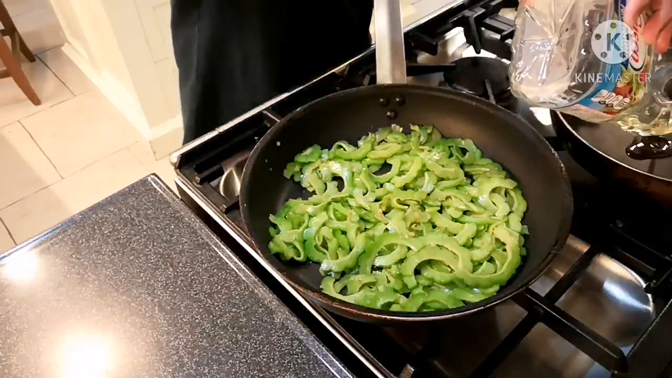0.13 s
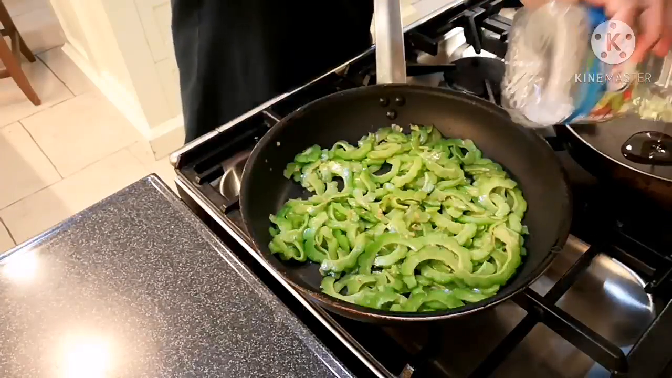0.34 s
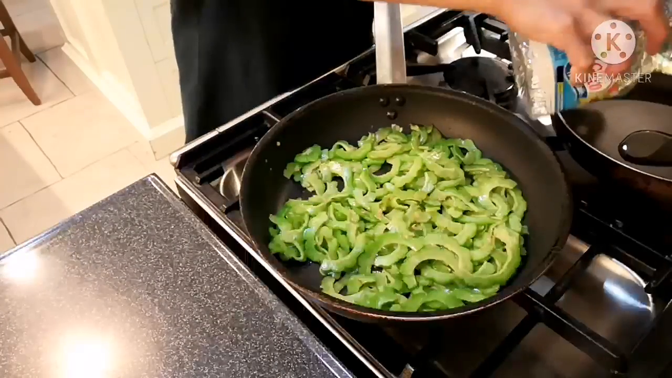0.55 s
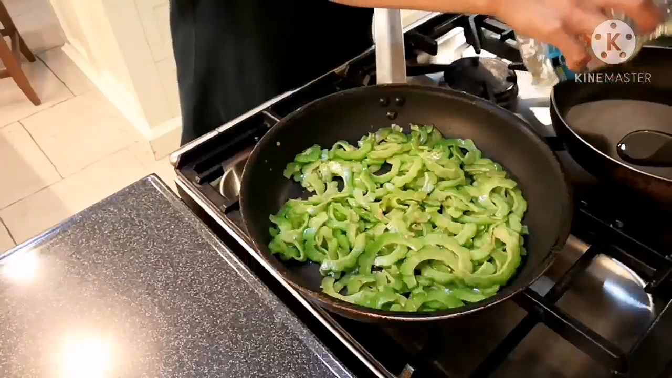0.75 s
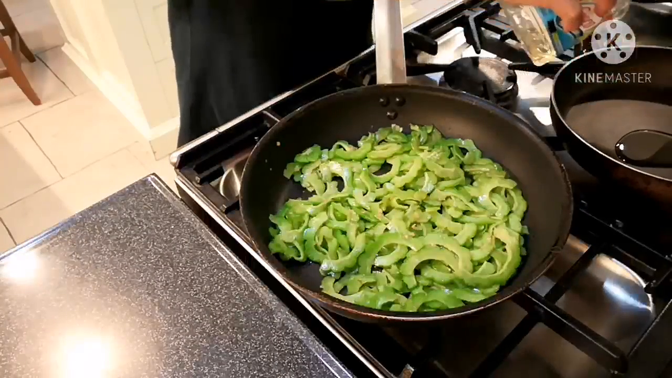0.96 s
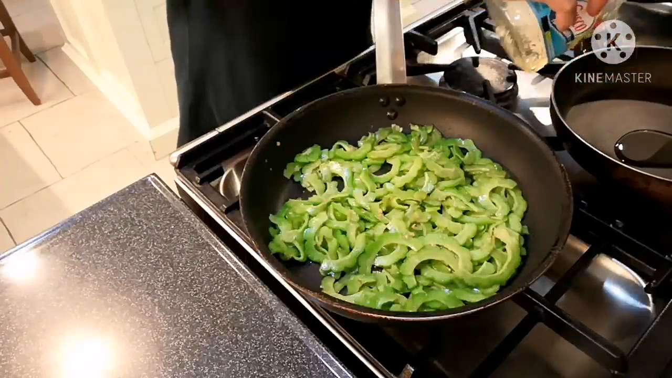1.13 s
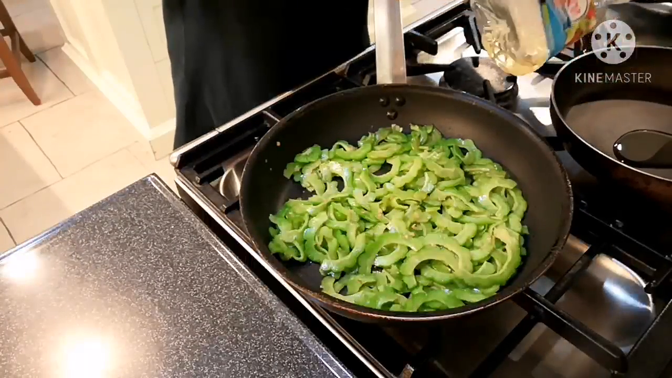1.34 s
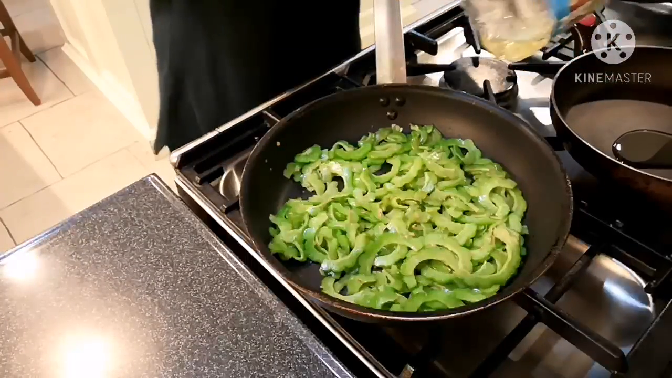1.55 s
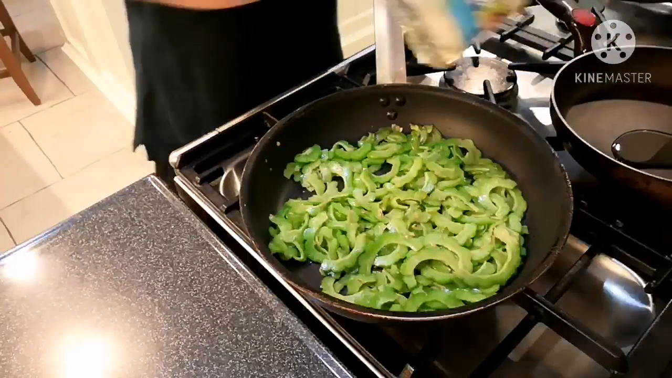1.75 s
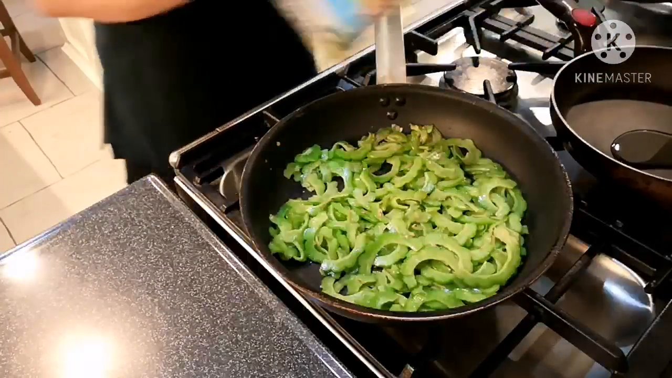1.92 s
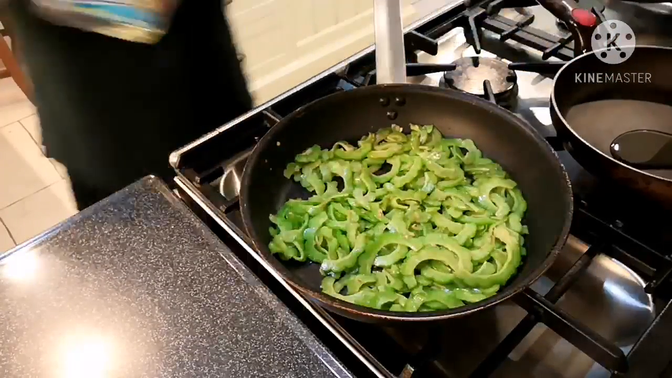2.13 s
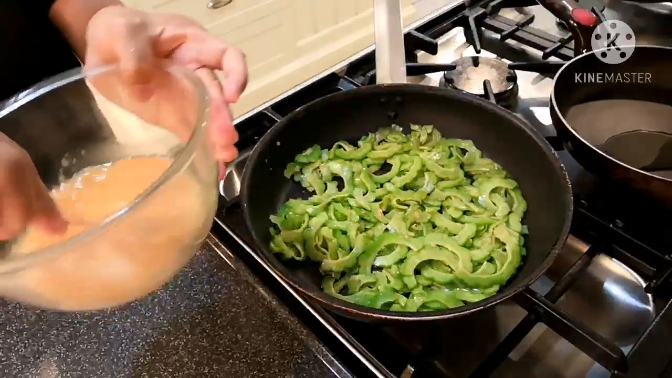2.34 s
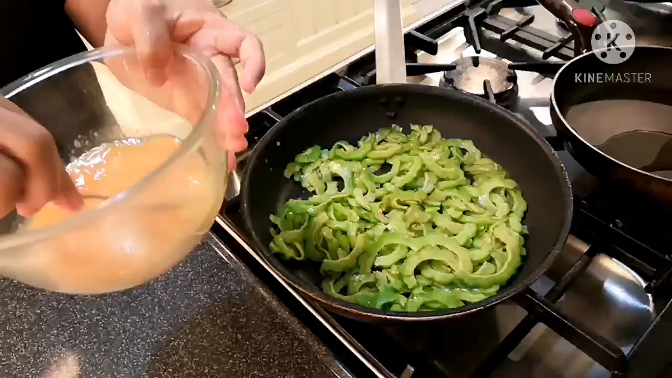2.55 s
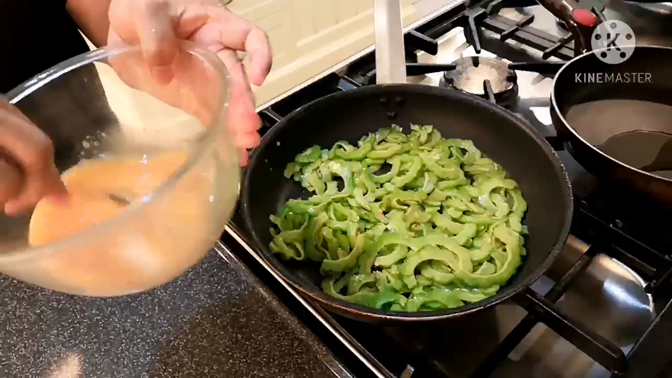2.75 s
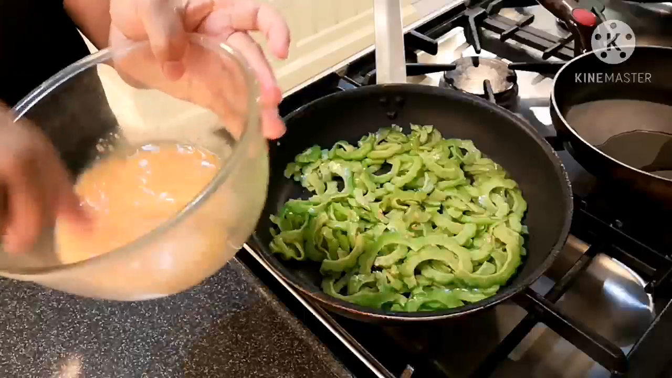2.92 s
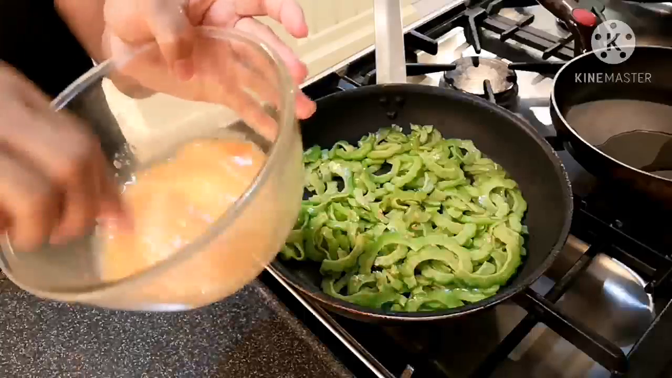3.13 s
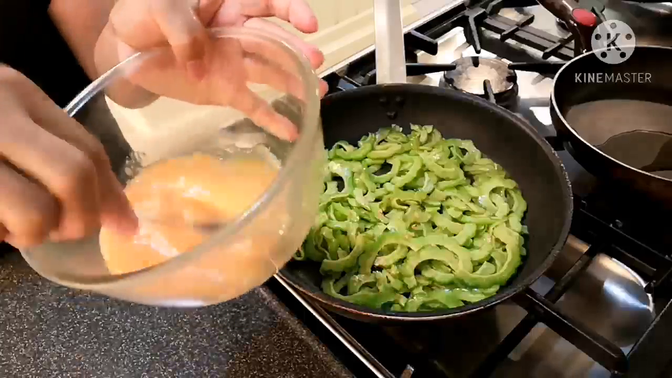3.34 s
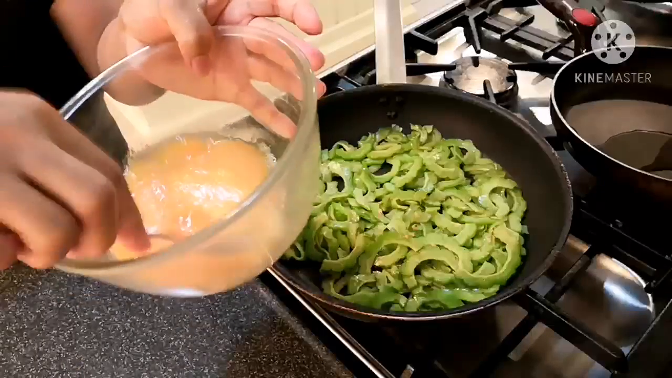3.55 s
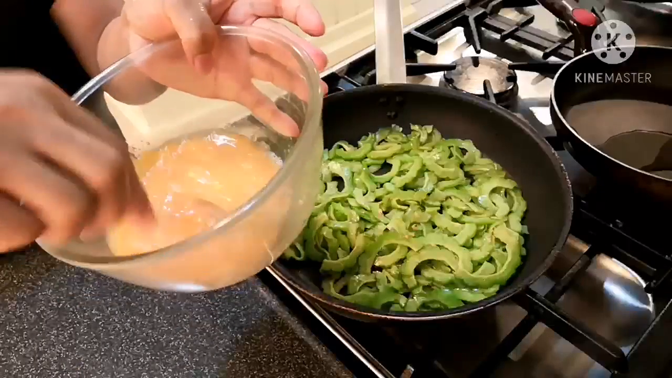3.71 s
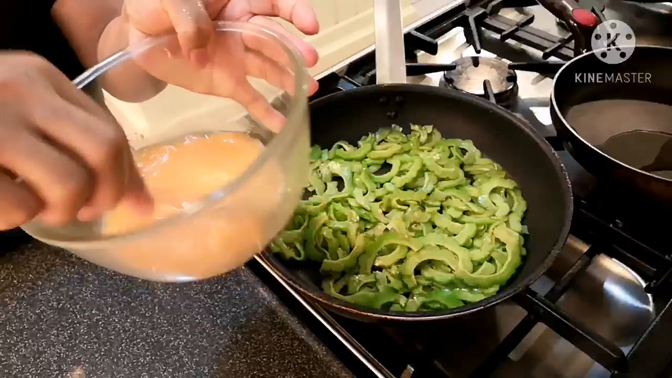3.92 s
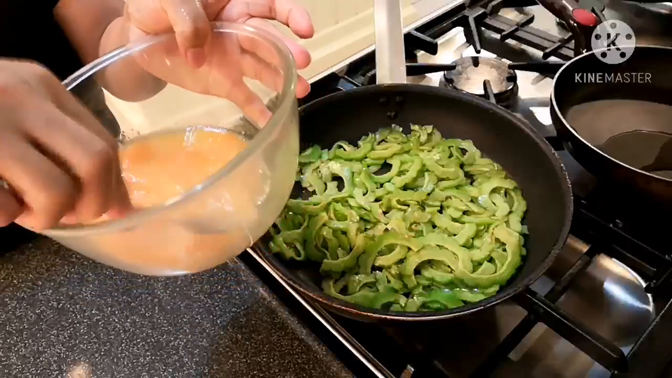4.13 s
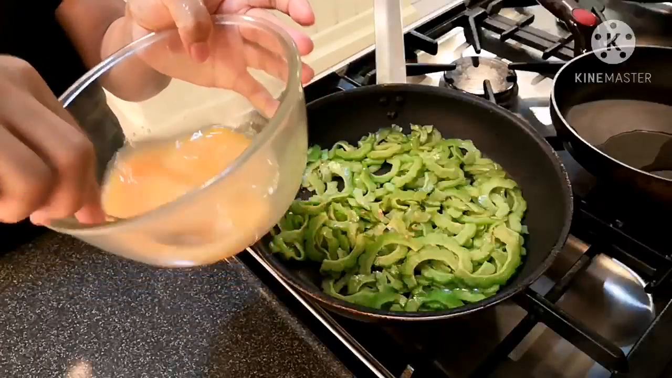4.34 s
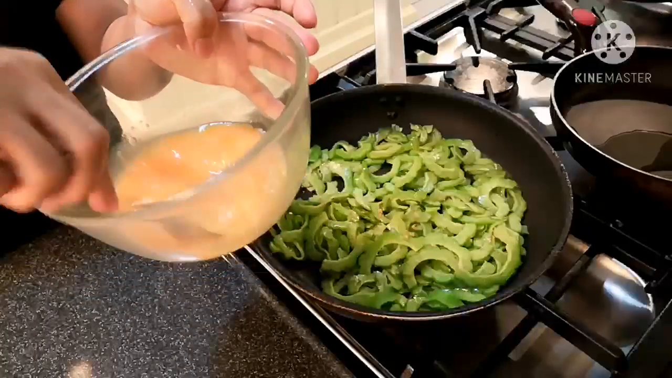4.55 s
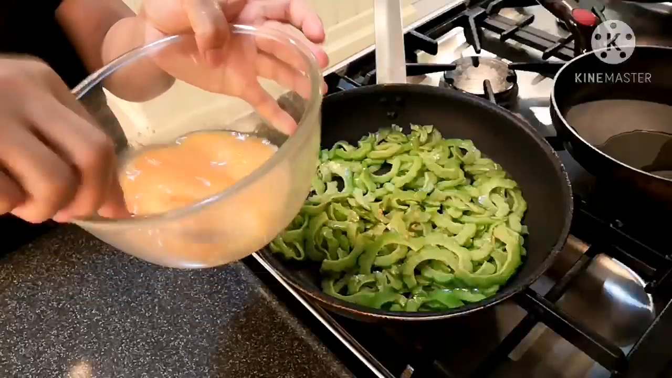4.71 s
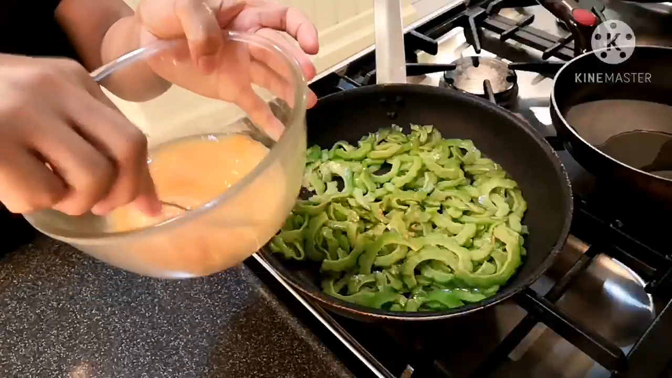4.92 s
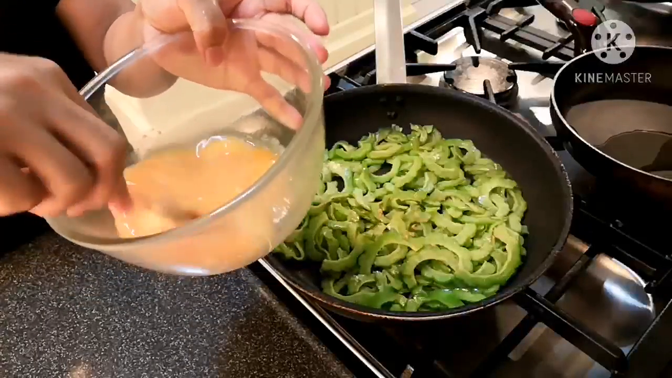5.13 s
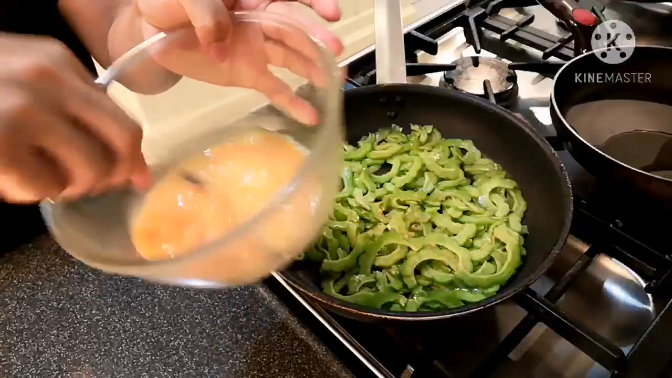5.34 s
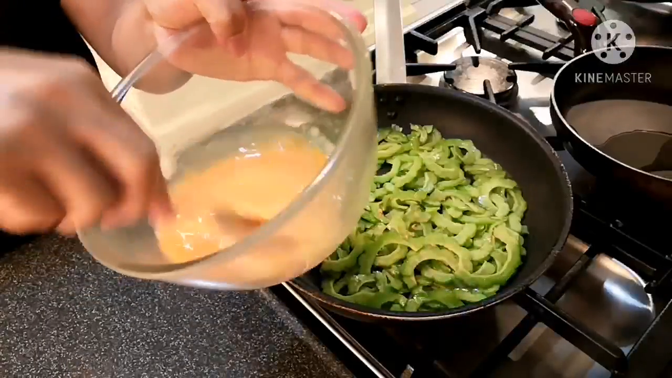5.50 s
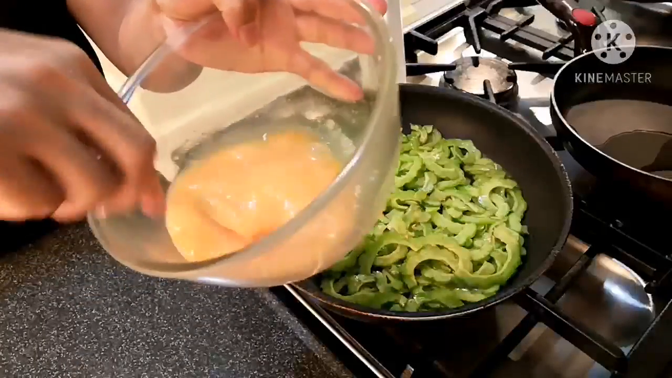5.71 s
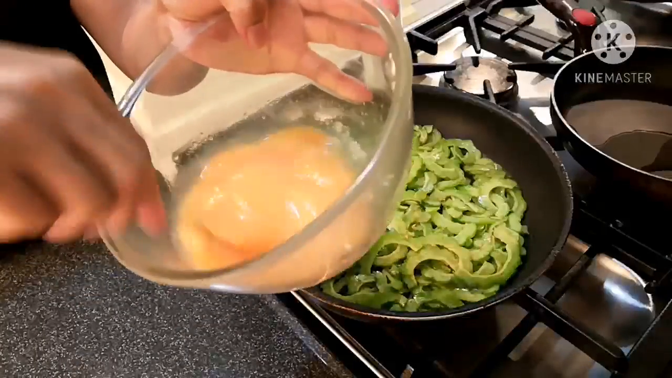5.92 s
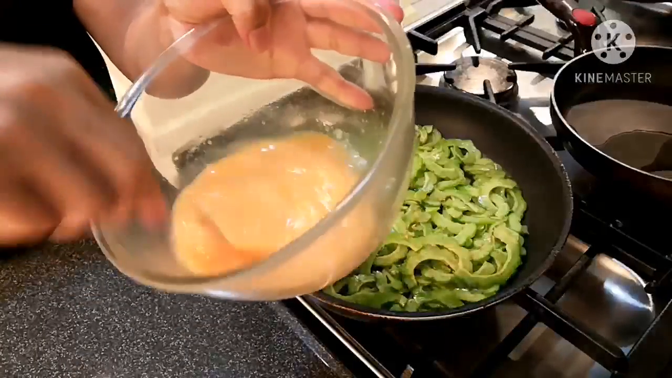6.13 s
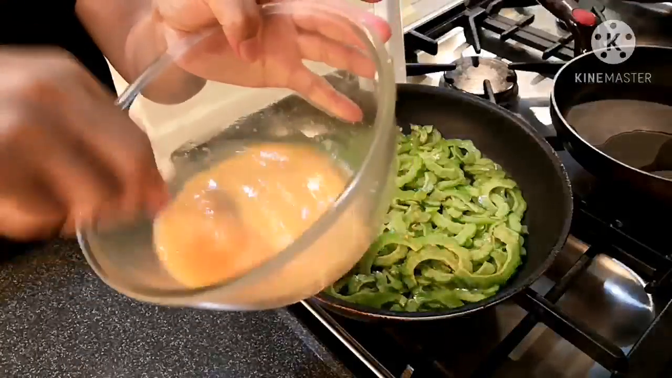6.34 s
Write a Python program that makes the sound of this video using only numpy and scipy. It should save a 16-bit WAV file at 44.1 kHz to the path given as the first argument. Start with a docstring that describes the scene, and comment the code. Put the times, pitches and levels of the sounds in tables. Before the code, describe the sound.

Over faint pan hiss and a throbbing motor hum, hollow counter knocks give way to bright, scraping fork strokes whisking egg in glass.

```python
"""A pan hisses softly, a motor hum throbs and the room rumbles: coloured noise, two beating sines, low noise bands.
Something is set down and slid on the counter: noise bursts ring its modes, and micro-slips rub and rattle.
Then a fork beats eggs in a hand-held glass bowl, five strokes a second: the tines tap and scrape, ringing
the glass modes; some strokes squeak at a mode's pitch, and the egg slaps low. Feedback delays add the kitchen."""
import sys
import numpy as np
from scipy import signal
from scipy.fft import rfft, irfft, next_fast_len
from scipy.io import wavfile
from scipy.ndimage import uniform_filter1d

SR = 44100
rng = np.random.default_rng(int(sys.argv[2]) if len(sys.argv) > 2 else 0)


def materialize(psi):
    """Save the field psi as 16-bit PCM at rate SR to the path in sys.argv[1].

    A 1-D psi becomes a single channel; in a 2-D psi each row is a channel.
    """
    bounded = np.clip(np.atleast_2d(psi).T, -1, 1)
    quanta = np.round(bounded * 32767).astype(np.int16)
    wavfile.write(sys.argv[1], SR, quanta)


N = 285327


def from_db(db):
    """Decibels to gain."""
    return 10 ** (np.asarray(db) / 20)


def rms_one(x):
    """Scale to rms 1."""
    return x / np.sqrt(np.mean(x ** 2) + 1e-20)


def in_time(rows):
    """Columns of a curve over seconds, one value per sample."""
    s, *columns = np.transpose(rows)
    return [np.interp(np.arange(N) / SR, s, c, left=-120) for c in columns]


def at_hz(points, hz):
    """Read a spectrum on a log frequency axis."""
    points_hz, values = np.transpose(points)
    return np.interp(np.log(hz), np.log(points_hz), values)


def bins_hz(size):
    """Frequencies of the rfft bins, at least 1 Hz."""
    return np.maximum(np.arange(size // 2 + 1) * SR / size, 1)


def colour(x, points):
    """Shape by a spectrum; rms 1."""
    size = next_fast_len(N)
    gains = from_db(at_hz(points, bins_hz(size)))
    return rms_one(irfft(rfft(x, size) * gains, size)[..., :N])


def band(x, low_hz, high_hz):
    """Butterworth band-pass."""
    return signal.sosfilt(signal.butter(2, [low_hz, high_hz], "band", fs=SR, output="sos"), x)


def sides(pan_db):
    """Left and right gains as a column, from left minus right in dB."""
    return from_db([[pan_db / 2], [-pan_db / 2]])


def ring(force, hz, t60_s):
    """Two-pole resonator: a unit click sets a decaying sine of height 1 ringing."""
    r, w = from_db(-60 / (t60_s * SR)), 2 * np.pi * hz / SR
    return signal.lfilter([0, np.sin(w)], [1, -2 * r * np.cos(w), r * r], force + 1e-18)


def add(out, s, sound):
    """Mix a short sound in at s seconds."""
    i = round(s * SR)
    out[..., i:i + sound.shape[-1]] += sound[..., :N - i]


def grit(per_s, spread_db):
    """Micro-slips of uneven size and random sign at random moments; rms 1."""
    sizes = from_db(spread_db * np.minimum(rng.exponential(1, N), 5)) * rng.choice([-1, 1], N)
    return rms_one(sizes * (rng.random(N) < per_s / SR))


def drift(rate_hz, count):
    """Low-passed noise of spread 1, drawn every 40th sample, with the steps smoothed."""
    r = np.exp(-2 * np.pi * rate_hz * 40 / SR)
    noise = rng.standard_normal((count, N // 40 + 502))
    slow = signal.lfilter([1], [1, -2 * r, r * r], noise)[:, 500:]   # drop the filter's start
    steps = np.repeat(slow / slow.std(axis=1, keepdims=True), 40, axis=1)[:, :N]
    return uniform_filter1d(steps, size=40)


def contact(rows, rise_s, drop_db, fall_db_per_s):
    """Level in dB, last column and time since release of the loudest of several contacts."""
    t = np.arange(N) / SR
    level, column, since = np.full(N, -120.), np.zeros(N), np.zeros(N)
    for s, length_s, first_db, last_db, extra in rows:
        free_s = np.maximum(t - s - length_s, 0)
        corners_s = [s, s + rise_s, s + max(length_s, 1.01 * rise_s)]
        held = np.interp(t, corners_s, [first_db - 30, first_db, last_db], left=-120)
        now = held - drop_db * (1 - np.exp(-free_s / .01)) - fall_db_per_s * free_s
        louder = now > level
        level, column, since = np.where(louder, [now, extra + 0 * t, free_s], [level, column, since])
    return level, column, since


# Pan hiss over room noise. Each row: frequency in Hz, relative density in dB per Hz.
HISS_COLOUR = [(250, -17), (420, -11), (578, -17), (772, -10), (899, -11.5), (2050, -3), (3140, -5.5),
               (7700, -1), (10600, -6.5), (12500, -22), (14600, -18), (16000, -47)]
# Likeness of the sides. Each row: frequency in Hz, left-right correlation from -1 to 1.
HISS_LIKENESS = [(40, .999), (100, .98), (180, .94), (330, .7), (600, -.35), (1400, .15), (3000, -.1),
                 (15000, 0)]
HISS_DB = -56.5


def pan_hiss():
    """Coloured noise whose left-right correlation varies with frequency."""
    size = next_fast_len(N)
    alike = np.clip(at_hz(HISS_LIKENESS, bins_hz(size)), -1, 1)
    mid, side = rfft(rng.standard_normal((2, size)))
    air = irfft(np.sqrt(1 + alike) * mid + np.sqrt(1 - alike) * side * [[1], [-1]], size)[:, :N]
    return from_db(HISS_DB) * colour(air, HISS_COLOUR)


# Rumble levels. Each row: time in seconds, deep level in dB, upper reference level in dB.
RUMBLE_LEVELS = [(0.0, -79, -66.5), (0.09, -73, -65), (0.94, -74, -64.5), (1.96, -72, -58.5),
                 (2.18, -73, -65.5), (2.77, -47, -59.5), (3.01, -64.5, -64.5), (3.6, -46.5, -62.5),
                 (3.69, -63.5, -59.5), (4.9, -66, -57), (5.15, -68, -61.5), (5.33, -53, -56),
                 (5.58, -63.5, -63.5), (5.87, -53, -62), (6.2, -63, -60.5), (6.47, -51, -60)]
# Wavering low drones of the appliances. Each row: frequency in Hz, level in dB re the upper reference.
APPLIANCE_DRONES = [(60, -7), (86, -8), (123, -6)]
DRONE_T60_S, BROAD_RUMBLE_DB = .7, -3.5   # broad noise re the upper reference


def room_rumble():
    """Two low noise bands, nearly alike on both sides, and noise-driven low resonances."""
    deep_db, upper_db = in_time(RUMBLE_LEVELS)
    deep, upper = rng.standard_normal((2, 1, N)) + 0.13 * rng.standard_normal((2, 2, N))
    rumble = from_db(deep_db) * rms_one(band(deep, 22.5, 34.7))
    broad = rms_one(band(band(upper, 30, 129), 43, 320))
    rumble = rumble + from_db(upper_db + BROAD_RUMBLE_DB) * broad
    for hz, level_db in APPLIANCE_DRONES:
        drone = rms_one(ring(rng.standard_normal(N), hz, DRONE_T60_S))
        rumble = rumble + from_db(upper_db + level_db) * drone
    return rumble


# Motor hum. Each row: time in seconds, peak of the lower tone in dB.
HUM_LEVELS = [(0, -68.5), (1.2, -68), (2.3, -65.5), (2.7, -60.5), (4.5, -59), (6.47, -61)]
HUM_HZ, THROB_HZ, THROB_DEPTH, THROB_PEAK_S = 214.1, 1.904, 0.7, 3.265
WHINE_HZ, WHINE_DB = 770, -82.5


def motor_hum():
    """Two close tones beat as a throb; air noise follows their level, over a faint steady whine."""
    t = np.arange(N) / SR - THROB_PEAK_S
    low_tone = np.sin(2 * np.pi * (HUM_HZ - THROB_HZ / 2) * t)
    high_tone = THROB_DEPTH * np.sin(2 * np.pi * (HUM_HZ + THROB_HZ / 2) * t)
    draught = 0.34 * rms_one(band(rng.standard_normal((2, N)), 167, 400))
    whine = from_db(WHINE_DB) * np.sin(2 * np.pi * WHINE_HZ * t)
    return whine + from_db(in_time(HUM_LEVELS)[0]) * (low_tone + high_tone + draught)


KITCHEN_T60_S, WALL_CUT_HZ = 0.3, 5940


def kitchen(x):
    """Reverb: eight feedback delays a side, duller on every round."""
    size = next_fast_len(N + SR)
    bins = np.arange(size // 2 + 1)
    z = np.exp(-2j * np.pi * bins / size)
    dull = np.exp(-2 * np.pi * WALL_CUT_HZ / SR)
    wall, out = (1 - dull) / (1 - dull * z), np.zeros((2, len(z)), complex)
    for k, lag in enumerate((rng.uniform(.006, .03, 16) * SR).astype(int)):
        loop = from_db(-60 * lag / SR / KITCHEN_T60_S) * wall * np.exp(-2j * np.pi * bins * lag / size)
        out[k % 2] += loop / (1 - loop) * (-1) ** (k // 2)
    return irfft(out * rfft(x, size), size)[:, :N]


# Knocks on the counter. Each row: start in seconds, relative level in dB, extra in dB below 600 Hz.
COUNTER_KNOCKS = [(.778, -47, -25), (1.27, -31.5, -20), (1.299, -46, 9.5), (1.373, -37.5, -15),
                  (1.43, -29.5, -9), (1.475, -26, -8), (1.489, -38, -4), (1.558, -29.5, -6.5),
                  (1.588, -56, 14), (1.72, -26.5, -11.5), (1.773, -40, -27), (1.823, -28.5, -15)]
# Modes of the worktop. Each row: frequency in Hz, relative level in dB, t60 in seconds.
COUNTER_MODES = [(190, -33, .08), (226.3, 1, 0.13), (360, -20, 0.04), (514, -2.5, 0.051), (932, -10, 0.04),
                 (1410, -4.5, 0.013), (1714, -1.5, 0.015), (2260, -21, .012), (2850, -7, 0.025)]


def counter_knocks():
    """Short noise bursts ring the modes of a hollow worktop."""
    out, t = np.zeros(N), np.arange(400) / SR
    bursts = rng.standard_normal((len(COUNTER_KNOCKS), len(t))) * np.exp(-t / 0.0033)
    for hz, level_db, t60_s in COUNTER_MODES:
        force = np.zeros(N)
        for (s, knock_db, thud_db), burst in zip(COUNTER_KNOCKS, bursts):
            chance_db = 2.5 * rng.standard_normal()
            add(force, s, from_db(knock_db + thud_db * (hz < 600) - 23 + chance_db) * burst)
        out += from_db(level_db) * ring(force, hz, t60_s)
    return out


# Rubbing on the counter. Each row: start in seconds, contact in seconds, first level in dB,
# last level in dB, rattle in dB re the rub.
COUNTER_RUBS = [(1.268, 0.031, -60, -49, -7), (1.425, .15, -54.5, -49, -5), (1.712, 0.28, -48, -49.5, -21),
                (2.1, 0.15, -62, -52, -20)]
# Colour of the rub. Each row: frequency in Hz, relative density in dB per Hz.
RUB_COLOUR = [(180, -36), (300, -21), (492, -25), (690, -16.5), (926, 1), (1520, -6.5), (1740, 1),
              (2560, 1), (3380, -13.5), (9370, -12.5), (12000, -25), (15600, -50), (22000, -120)]
RUB_START_S, RUB_DROP_DB, RUB_FADE_DB_PER_S = 0.0035, 7.5, 197


def counter_rubs():
    """Sliding as coloured micro-slips, with sparser slips rattling low."""
    rub_db, rattle_db, _ = contact(COUNTER_RUBS, RUB_START_S, RUB_DROP_DB, RUB_FADE_DB_PER_S)
    rattle = rms_one(band(band(grit(600, spread_db=2.5), 150, 400), 150, 600))
    rub = colour(grit(2500, spread_db=1.5), RUB_COLOUR)
    return from_db(rub_db) * (rub + from_db(rattle_db) * rattle)


# The egg slaps the glass. Each row: start in seconds, relative level in dB, frequency in Hz.
EGG_SLAPS = [(2.224, -43.5, 1010), (3.15, -44, 880), (3.85, -35.5, 778), (3.887, -35, 822),
             (4.028, -36, 750), (4.088, -32, 765), (4.33, -24.5, 751), (4.67, -33.5, 760),
             (4.858, -41, 797), (5.189, -43.5, 747), (5.375, -41.5, 1260), (5.669, -35, 619),
             (5.784, -36.5, 738), (6.251, -40, 870), (6.385, -42.5, 750)]
SLAP_RING_T60_S, SLAP_SIDE_DB = .08, 15.5


def egg_slaps():
    """Each slap rings low as a close pair of sines, with a wet splat of band noise around it."""
    out, t = np.zeros((2, N)), np.arange(6000) / SR
    splats = band(band(rng.standard_normal((len(EGG_SLAPS), len(t))), 770, 1260), 590, 1940)
    for (s, level_db, hz), splat in zip(EGG_SLAPS, splats):
        pair = np.sin(2 * np.pi * hz * t) + 0.21 * np.sin(2 * np.pi * 1.2 * hz * t)
        slap = 1.02 * pair * np.minimum(t / 0.00087, 1) + 3.65 * splat * np.exp(-t / 0.0093)
        add(out, s, from_db(level_db - 60 * t / SLAP_RING_T60_S) * slap * sides(SLAP_SIDE_DB))
    return out


# A tine squeaks and pumps one mode. Each row: peak time in seconds, relative level in dB,
# frequency in Hz, ring left after it in dB re the peak.
TINE_SQUEAKS = [(2.285, -35.5, 7230, -7), (2.291, -38.5, 2483, -4), (2.481, -19, 7360, -13),
                (2.485, -27.5, 4730, -13), (2.498, -23, 2432, -13.5), (2.503, -26.5, 3670, -17),
                (2.655, -30.5, 3640, -14), (2.672, -27.5, 5420, -10), (2.84, -18.5, 7300, -21.5),
                (2.845, -28, 9500, -23), (2.855, -22.5, 2475, -12.5), (3.116, -23.5, 4870, -32),
                (3.735, -23.5, 3596, -27), (3.935, -26.5, 2434, -30), (4.259, -20, 2430, -15),
                (4.262, -28, 7480, -8), (4.264, -24.5, 4810, -22), (5.029, -9, 5490, -14.5),
                (5.033, -21, 10730, -19.5), (5.043, -17.5, 2479, -12.5), (5.237, -17, 9440, -17.5),
                (5.4, -18.5, 5350, -20), (5.408, -26, 7340, -16), (5.815, -28, 6720, -19),
                (5.815, -29.5, 4680, -17), (5.825, -24.5, 2440, -13.5), (6.017, -27, 2462, -11)]
# Each mode favours a side. Each row: frequency in Hz, left minus right in dB.
SQUEAK_SIDES = [(2400, 4), (3700, 2.5), (5500, 3.5), (7400, 7.5), (9500, -4)]
SWELL_CYCLES, LET_GO_S, AFTER_RING_T60_S = 30, 0.0057, 0.47


def squeaks():
    """Stick-slip at a mode's pitch swells, lets go and leaves the mode ringing."""
    out, t = np.zeros((2, N)), np.arange(-2000, 9000) / SR
    wobble = drift(70, count=2 * len(TINE_SQUEAKS))[:, :len(t)].reshape(2, -1, len(t))
    for (s, level_db, hz, after_db), beat, waver in zip(TINE_SQUEAKS, *wobble):
        hump = np.exp(-(t / np.where(t < 0, SWELL_CYCLES / hz, LET_GO_S)) ** 2)
        # close modes beat unevenly
        tail = from_db(after_db - 60 * t / AFTER_RING_T60_S + 2.4 * beat) * (t > 0)
        tone = np.sin(2 * np.pi * hz * t + 0.93 * waver)
        pan = sides(at_hz(SQUEAK_SIDES, hz))
        add(out, s + t[0], from_db(level_db) * np.maximum(hump, tail) * tone * pan)
    return out


# Strokes of the tines along the glass. Each row: start in seconds, contact in seconds,
# first relative level in dB, last relative level in dB, relative treble in dB.
FORK_STROKES = [(2.195, 0.052, -50, -34, -16), (2.27, 0.095, -44, -48, -2.5),
                (2.449, 0.045, -43.5, -34, 8.5), (2.636, 0.051, -33, -36.5, 3.5),
                (2.78, 0.044, -40, -40, 2), (2.828, 0.044, -42, -39, 7), (3.056, .012, -38, -43, 1),
                (3.09, 0.037, -40.5, -34, 3.5), (3.149, 0.023, -27, -41, 1), (3.272, 0.059, -39.5, -36, 2),
                (3.355, 0.019, -33, -46.5, 3), (3.488, 0.056, -31.5, -32.5, -1),
                (3.654, 0.063, -39.5, -28.5, 2.5), (3.85, 0.074, -36.5, -33, 3),
                (4.045, 0.055, -41.5, -29.5, 5), (4.228, 0.04, -45.5, -30.5, 6),
                (4.3, 0.042, -29, -38.5, -5.5), (4.439, 0.082, -29.5, -34.5, -7.5),
                (4.612, 0.076, -33.5, -30, -2), (4.817, 0.066, -33.5, -24.5, -5),
                (4.995, 0.069, -32.5, -28.5, 0), (5.204, 0.054, -22.5, -31, -5),
                (5.385, 0.03, -31.5, -30, 2), (5.44, 0.023, -40, -31, -2), (5.587, 0.055, -27, -27, -5),
                (5.795, 0.021, -50, -30, 7.5), (5.999, 0.049, -33, -34, 0.5),
                (6.125, 0.0036, -24, -43.5, 1.5), (6.195, .04, -34, -37, 2.5),
                (6.247, 0.015, -28.5, -37, -6.5), (6.382, 0.048, -28.5, -28.5, -1.5)]
TOUCH_S, LIFT_DROP_DB, LIFT_DB_PER_S, DULLING_DB_PER_S = 0.0046, 5.5, 173, 71


def stroke_levels():
    """Drag and treble in dB: tines land, then lift away, the treble fading first."""
    drag_db, bright_db, lifted_s = contact(FORK_STROKES, TOUCH_S, LIFT_DROP_DB, LIFT_DB_PER_S)
    return drag_db, bright_db - DULLING_DB_PER_S * np.minimum(lifted_s, .2)


def micro_slips(cycles, patchy_db, apart, catch):
    """Slips ring 34 pitches as short tones; shared catches of a tine make all pitches speak."""
    out, catches = np.zeros((2, N)), grit(120, spread_db=3.0)
    for hz in np.geomspace(700, 15000, 34):
        patches = from_db(patchy_db * drift(19.0, count=1)[0])
        slips = (grit(250, spread_db=3.0) + catch * catches) * patches
        # a bounce inside the bowl reaches the sides in opposite sense
        bounce = np.roll(slips, 150) * apart
        tones = ring(np.array([slips + bounce, slips - bounce]), hz, cycles / hz)
        out += rms_one(tones) * np.sqrt(hz)
    return out


# Dry rasp of the tines. Each row: frequency in Hz, relative density in dB per Hz.
RASP_COLOUR = [(350, -59), (600, -26), (758, -17), (957, -22.5), (1290, -37.5), (1610, -5), (2440, 2),
               (2990, -3.5), (3730, -3.5), (4280, -14), (5560, -3.5), (6460, -11.5), (9490, -5),
               (12000, -24), (14800, -17.5), (16000, -34)]


def dry_rasp(drag_db, bright_db):
    """Micro-slips follow the strokes, with the treble above 4500 Hz levelled apart."""
    slips = colour(micro_slips(cycles=52, patchy_db=6.5, apart=1.0, catch=0.42), RASP_COLOUR)
    bright = signal.sosfilt(signal.butter(4, 4500, "high", fs=SR, output="sos"), slips)
    dull = signal.sosfilt(signal.butter(4, 4500, fs=SR, output="sos"), slips)
    return from_db(drag_db - 2.5) * (dull + from_db(bright_db + 4.5) * bright) * sides(3.3)


# Tines striking the glass. Each row: start in seconds, relative level in dB, strongest frequency in Hz.
TINE_TAPS = [(2.2965, -38, 2480), (2.321, -30, 2410), (2.452, -34.5, 2530), (2.4743, -23, 7860),
             (2.4862, -22.5, 2475), (2.613, -28, 2500), (2.635, -27, 3780), (2.6677, -21.5, 2350),
             (2.7817, -35, 2040), (2.794, -30, 2720), (2.8327, -14.5, 7350), (2.8473, -36, 2450),
             (3.0564, -18.5, 2160), (3.1017, -21.5, 2400), (3.1507, -22.5, 1618), (3.1678, -25, 3290),
             (3.275, -27.5, 2500), (3.3199, -21, 8660), (3.357, -22, 6540), (3.4895, -22.5, 1940),
             (3.5055, -15, 2920), (3.655, -27.5, 1980), (3.6864, -18, 2425), (3.8509, -22.5, 1660),
             (3.8644, -29, 2000), (3.904, -23, 6000), (4.0274, -30.5, 1620), (4.0592, -25, 5450),
             (4.0786, -20, 2550), (4.0978, -23, 1610), (4.2323, -28.5, 2100), (4.2425, -18, 5580),
             (4.3107, -23.5, 3350), (4.44, -17.5, 2130), (4.4486, -18, 2490), (4.6124, -25.5, 2140),
             (4.6439, -22, 2490), (4.6694, -20.5, 1645), (4.686, -20, 6060), (4.8181, -30.5, 2000),
             (4.8456, -25, 3970), (4.8566, -17, 3630), (4.88, -16.5, 2370), (4.915, -23.5, 2390),
             (4.996, -27, 1980), (5.0119, -19.5, 1890), (5.205, -20, 3570), (5.2214, -18, 9200),
             (5.385, -19, 2100), (5.3964, -18.5, 3550), (5.462, -24, 1790), (5.5023, -27, 4140),
             (5.5885, -14.5, 1560), (5.5996, -16, 2016), (5.611, -24, 2160), (5.67, -20.5, 1630),
             (5.705, -32, 1490), (5.7848, -26, 1690), (5.8021, -18.5, 1690), (5.815, -14.5, 2260),
             (5.9753, -36.5, 1680), (5.9997, -18, 1976), (6.012, -21, 9540), (6.0475, -24.5, 5840),
             (6.1266, -22.5, 9500), (6.1634, -39, 3640), (6.197, -22.5, 1936), (6.2094, -20, 2390),
             (6.248, -17, 1984), (6.33, -35, 1890), (6.3837, -20, 2030)]
TAP_PAN_DB, TAP_PAN_SPREAD_DB = 1, 4


def tap_chatter():
    """A short noise burst of unit energy per tap: four tines never land together."""
    t = np.arange(1200) / SR
    chatter = rng.standard_normal((len(TINE_TAPS), len(t))) * np.exp(-t / 0.001)
    return chatter / np.linalg.norm(chatter, axis=1, keepdims=True)


def tap_clicks(chatter):
    """The damped click of each contact: two short resonances and a spray of noise."""
    clicks, t = np.zeros((2, N)), np.arange(chatter.shape[1]) / SR
    pans_db = rng.normal(TAP_PAN_DB, TAP_PAN_SPREAD_DB, len(TINE_TAPS))
    spray = rng.standard_normal((len(TINE_TAPS), 2, len(t))) * np.exp(-t / 0.0043)
    for (s, tap_db, tap_hz), pan_db, burst, splash in zip(TINE_TAPS, pans_db, chatter, spray):
        snap = ring(burst, tap_hz, 0.031) + 0.16 * ring(burst, 1.306 * tap_hz, 0.018)
        click = snap / abs(snap).max() + from_db(-10.0) * splash
        add(clicks, s, from_db(tap_db) * click * sides(pan_db))
    return from_db(-2.0) * band(band(clicks, 1090, 12400), 950, 13200)


# Modes of bowl and fork. Each row: frequency in Hz, relative level in dB, t60 in seconds,
# left minus right in dB.
BOWL_MODES = [(695, -32, 0.028, 3), (1609, -9, 0.064, -18.5), (1820, -13, 0.13, -3),
              (1987, -2.5, 0.054, 11.5), (2269, -11, 0.18, 13), (2367, -15.5, 0.28, -3),
              (2494, -4.5, 0.17, 8.5), (2626, -7.5, 0.16, 2), (3700, -10, 0.079, -10.5),
              (3870, -11.5, 0.052, 19.5), (4940, -1, 0.047, 4.5), (5940, -18, 0.093, 19),
              (5530, -15, 0.18, 16), (5680, -11.5, 0.057, 2), (6900, -9.5, 0.032, 27),
              (7015, -10, 0.17, 16.5), (7480, -21, 0.15, 23.5), (9800, -9, 0.11, -28)]


def bowl_ring(drag_db, bright_db, chatter):
    """Rubbing and taps drive the modes; sloshing egg and a shaking hand blur the ring."""
    out = np.zeros((2, N))
    rub = from_db(drag_db) * grit(3000, spread_db=3.0)
    luck_db = rng.normal(0, 2.5, (len(TINE_TAPS), len(BOWL_MODES)))
    for k, (hz, level_db, t60_s, pan_db) in enumerate(BOWL_MODES):
        force = from_db(-41.5 + bright_db * (hz > 4500) + 3.0 * drift(4.0, count=1)[0]) * rub
        for (s, tap_db, tap_hz), burst, chance_db in zip(TINE_TAPS, chatter, luck_db[:, k]):
            # modes near the struck spot's pitch answer most
            away_db = -9.0 * abs(np.log2(hz / tap_hz))
            add(force, s, from_db(tap_db - 17.5 + away_db + chance_db) * burst)
        wobble = from_db(5.34 * drift(67, count=2))
        out += from_db(level_db) * sides(pan_db) * wobble * ring(force, hz, t60_s)
    return out


def fork():
    """Drags and taps rasp and click, and both drive the modes of bowl and fork."""
    drag_db, bright_db = stroke_levels()
    chatter = tap_chatter()
    return dry_rasp(drag_db, bright_db) + bowl_ring(drag_db, bright_db, chatter) + tap_clicks(chatter)


RIGHT_LAG_SAMPLES = 22   # the bowl arrives later on the right


def scene():
    """The bowl close by, the counter further off, both in the room, over the background."""
    background = pan_hiss() + room_rumble() + motor_hum()
    far = counter_knocks() + counter_rubs()
    # a small bowl radiates no bass
    thin = signal.butter(5, 640, "high", fs=SR, output="sos")
    bowl = signal.sosfilt(thin, egg_slaps() + squeaks() + fork())
    room = kitchen(from_db(-16) * bowl.mean(axis=0) + from_db(-6.5) * band(far, 420, 14000))
    bowl[1] = np.pad(bowl[1], (RIGHT_LAG_SAMPLES, 0))[:N]
    return from_db(-0.5) * bowl + far + room + background


CUTOFF_HZ = 16700   # 60 dB down from here up


def record(dry):
    """A steep low-pass cuts the top."""
    return signal.sosfilt(signal.cheby2(10, 60, CUTOFF_HZ, fs=SR, output="sos"), dry)


dry = scene()
out = record(dry)
materialize(out)
```